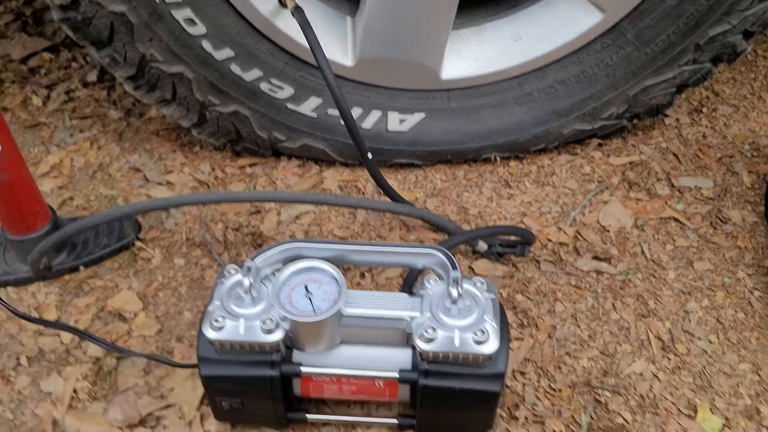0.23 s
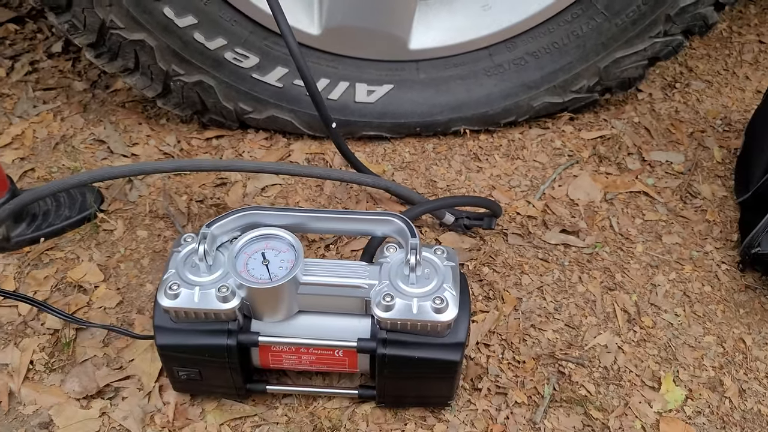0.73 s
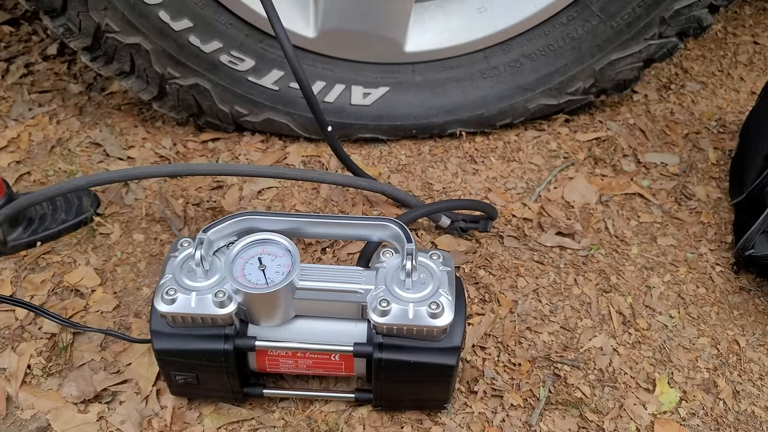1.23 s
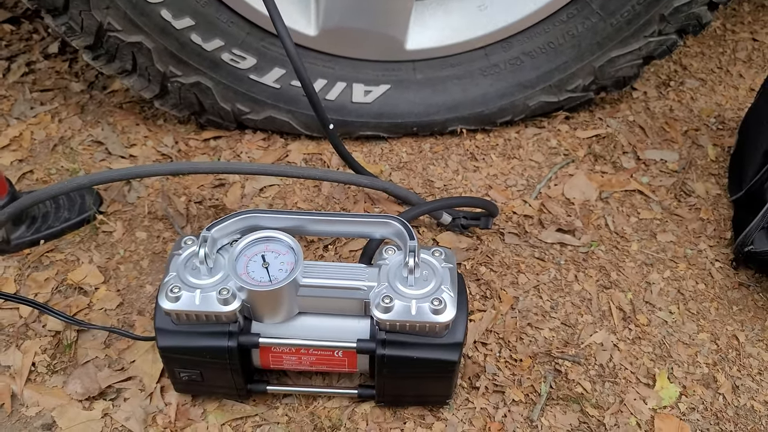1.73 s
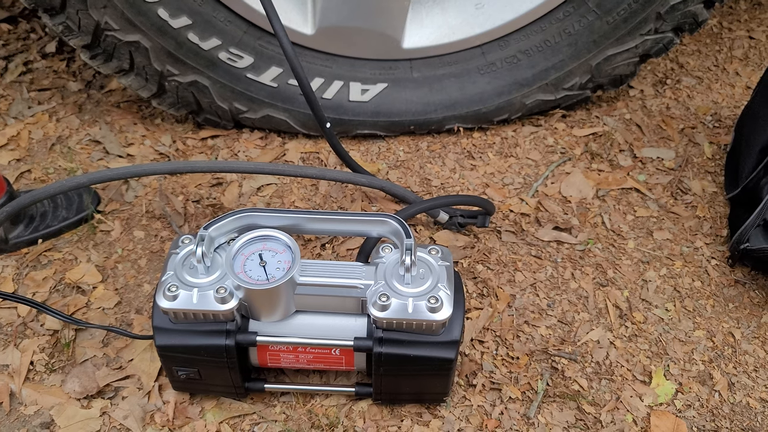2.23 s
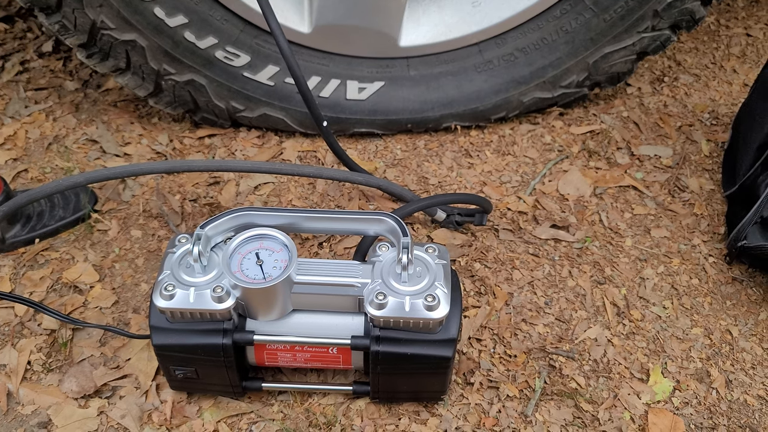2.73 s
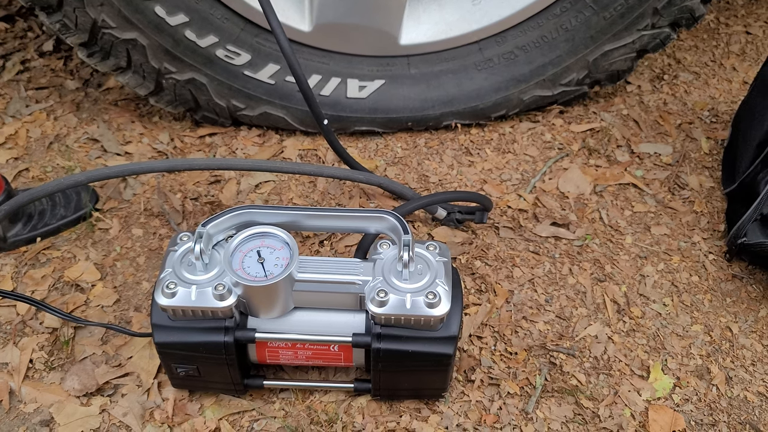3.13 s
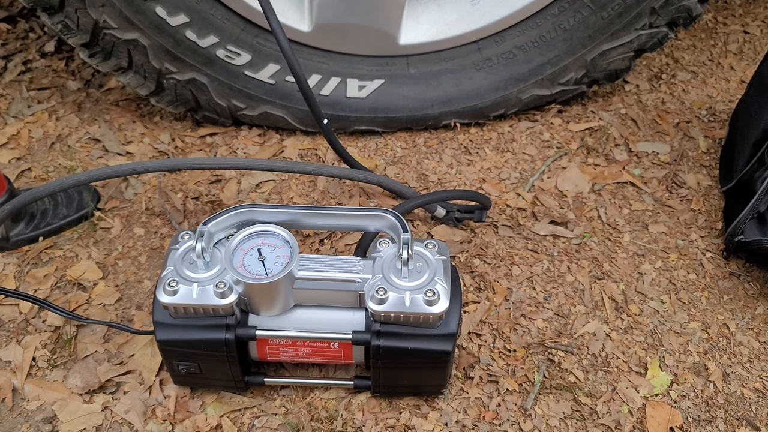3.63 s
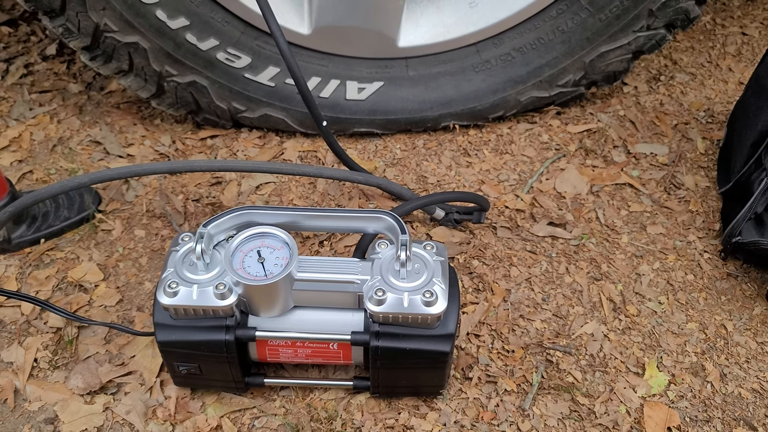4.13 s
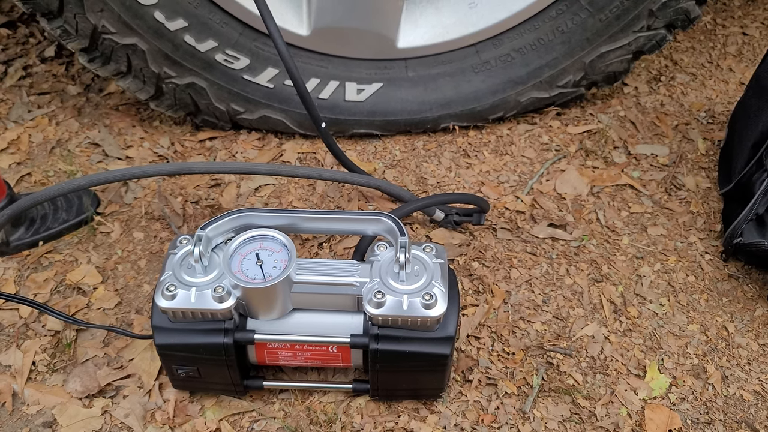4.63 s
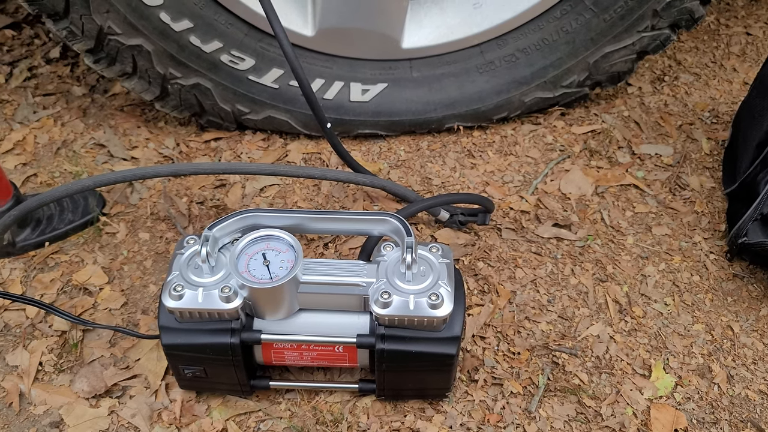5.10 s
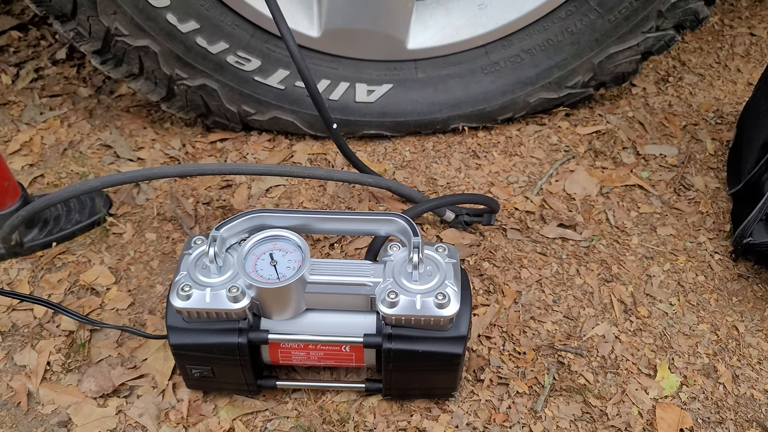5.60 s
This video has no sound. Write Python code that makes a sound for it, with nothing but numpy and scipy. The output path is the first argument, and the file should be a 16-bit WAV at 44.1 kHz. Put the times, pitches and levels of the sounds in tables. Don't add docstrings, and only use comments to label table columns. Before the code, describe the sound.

Close stereo sound of a small tire pump working outdoors: a steady mid-low drone, fast ticking metal valves fused into a rattle, bright breathy hiss and a faint thin motor whine. The speed barely changes, though the upper buzz softens slightly later on. A bird chirps briefly near the start and again at the very end, over faint wind rumble.

```python
import sys
import numpy as np
from scipy import signal
from scipy.fft import rfft, irfft
from scipy.io import wavfile

SR = 44100
rng = np.random.default_rng(int(sys.argv[2]) if len(sys.argv) > 2 else 0)


def gain_from_decibels(decibels):
    exponent = np.asarray(decibels, float) / 20
    return 10 ** exponent


def output_pcm(signal):
    pcm = np.clip(np.atleast_2d(signal).T, -1, 1) * 32767
    wavfile.write(sys.argv[1], SR, np.round(pcm).astype(np.int16))


N = 258426

# time_s, speed_turns_per_s
CRANK_SPEED = [(0, 34.731), (1.3, 34.752), (1.8, 34.817), (2.3, 34.825), (2.55, 34.796), (2.85, 34.813),
               (3.05, 34.843), (3.4, 34.849), (3.65, 34.811), (3.9, 34.821), (4.2, 34.865), (4.6, 34.823),
               (4.96, 34.818), (5.2, 34.833), (5.86, 34.82)]
START_TURN = 0.95
# time_s, level_db
HAND_NEARNESS = [(0, 2), (.4, 2.5), (.8, 1.5), (1.5, 2), (2.5, 1.5), (3.5, 1.5), (4.5, 1.5), (5.2, 2),
                 (5.86, 2)]

# pitch_hz, level_db (per Hz)
BREEZE_COLOUR = [(15, -35), (28, -14), (42, -3), (55, 8), (80, -2), (120, -2.5), (250, -31), (500, -24)]
BREEZE_DB = -46.5
# start_s, length_s, start_pitch_hz, end_pitch_hz, level_db
BIRD_CHIRPS = [
    (.178, .038, 4050, 4500, -36.5),
    (.563, .038, 4020, 4500, -36),
    (5.51, .035, 4150, 4450, -41.5),
    (5.768, .008, 5500, 3900, -32.5),
]

MOTOR_ORDERS = [50, 75, 81, 94]
# level_db, swell_over_run_db, left_minus_right_db
MOTOR_WHINE = [(-51.5, -4.5, -10), (-49.5, -7, -4), (-59, 8, 4), (-57, 9.5, -7)]

# order (cycles per crank turn), level_db
HUM_ORDERS = [(1, -25), (2, -9), (3, -22), (4, -9), (5, -19), (6, -17), (7, -12), (8, -15), (9, -12),
              (10, -7), (11, -18), (12, -20), (13, -23), (14, -27), (15, -26), (16, -24),
              (17, -21), (18, -9), (19, -7), (20, -9), (21, -9), (22, -13), (23, -6), (24, 0), (25, -1),
               (26, -1), (27, -11), (28, -9), (29, -7), (30, -11), (31, -20), (32, -12), (33, -11),
               (34, -22), (35, -17), (36, -14), (37, -15), (38, -22), (39, -14), (40, -20), (41, -21),
               (42, -28)]
# pitch_hz, crank_angle_turns
HOUSING_BLOWS = [(170, -.067), (453, .081), (484, .467), (625, .052), (787, 1.135), (807, .469),
                 (924, .172), (980, .9), (1182, -.134), (1533, -.096)]
THUMP_START = -0.243
# pitch_hz, left_minus_right_db
HUM_BALANCE = [(60, 0), (150, 1), (300, 0.5), (500, -2), (700, 3), (900, -2.5), (1100, -2), (1500, -7)]
# time_s, level_db
UPPER_HUM_LEVEL = [(0, 4.5), (.5, 2.5), (1.5, 1), (3, 1.5), (4.5, -3), (5.86, -3)]
UPPER_HUM_FROM_HZ = 1300
HUM_DB, HUM_LAG_MS, HUM_WAVER_DB, ONCE_A_TURN_DB = -32, -0.12, 0.3, -14
HUM_NEAR_SHARE, HUM_LIFT_DB = 0.34, -0.62

# pitch_hz, level_db (per Hz)
LEFT_HISS = [(300, 4.5), (480, -1), (640, 17), (1000, 13.5), (1500, 6.5), (2000, 7.5), (3300, 5),
             (4500, 0.5), (5800, -3), (8200, 0.5), (9300, -11.5), (12000, -10.5), (14500, -6.5),
             (15800, -14.5)]
# pitch_hz, level_db (per Hz)
RIGHT_HISS = [(300, 6), (480, -0.5), (640, -6), (1000, 7.5), (1500, 0), (2000, 7), (3300, 2.5), (4500, 1.5),
              (5900, 8), (7200, 3), (8800, -23), (10400, -6.5), (12000, -14.5), (15800, -27.5)]
# pitch_hz, likeness (-1 to 1)
EAR_LIKENESS = [(100, 0.5), (700, 0.12), (2000, 0.49), (5000, 0.24), (9000, 0.23), (15000, 0.13)]
# pitch_hz, width_hz, level_db (over the hiss)
COOLING_FINS = [(12950, 150, 6), (13400, 200, 4), (13950, 160, 4), (14250, 140, 4), (14600, 150, 7),
                (15000, 140, 5), (15550, 200, 4)]
# crank_angle_turns, width_turns, level_db (over steady hiss), fin_level_db
AIR_STROKES = [
    (.31, .11, 5.5, 2),
    (.80, .095, 7, 9),
]
HISS_DB = -34.5
REPEAT_SHARE, REPEAT_FROM_HZ = 0.5, 1450

# (pitch_hz, rise_ms, level_db, left_minus_right_db)
VALVE_SLAPS = [
    (.05, -.15, [(1800, 1.5, -42, -3), (3250, 1.2, -42, 2)]),
    (.20, -0.21, [(5650, 1.5, -31, -5.5), (6460, 4.5, -41.5, -4), (7700, 1.2, -45, 18), (3294, 2.4, -39.5, 2), (1740, 2.3, -39.5, -2)]),
    (.34, -0.16, [(4850, 0.27, -40.5, 4), (5370, 0.92, -39, 0), (2250, 0.72, -38, -10)]),
    (0.641, -0.11, [(1741, 1.2, -33, -1), (2617, 2.75, -41.5, 5), (6120, 1.8, -37, -9), (5350, 2.9, -39.5, -10)]),
    (0.741, -0.13, [(3270, 2.4, -42, 8), (3970, 0.62, -37.5, 4), (6940, 0.64, -42.5, -7), (7940, 3.2, -51, 20), (2600, 0.75, -40, 2)]),
    (0.791, -0.13, [(1997, 0.95, -30, -7.5), (2820, 3.1, -39.5, -2), (6130, 1.2, -28.5, -8), (5180, 1.1, -38, -6), (7970, 0.53, -45, 18), (4700, 2.1, -45, 7), (14600, 1.5, -44, 8), (12950, 1.5, -45, 8)]),
]
SLAP_DB, SLAP_DRIFT_DB = 0.6, 0.5
SLAP_JITTER_MS, SLAP_WANDER_MS = 0.008, 0.022
SLAP_EARLY = 0.018


def evened(x):
    return x / np.sqrt(np.mean(x ** 2))


def read(points, hz):
    pitch, value = np.transpose(points)
    return np.interp(np.log(hz + 1), np.log(pitch + 1), value)


def curve(points):
    return np.interp(np.arange(N) / SR, *np.transpose(points))


def drift(top_hz):
    steps = rng.standard_normal(int(N / SR * top_hz * 2) + 2)
    places = np.linspace(0, len(steps) - 1, N)
    return evened(np.interp(places, np.arange(len(steps)), steps))


def noise(left_colour, right_colour, lag_ms):
    hz = np.fft.rfftfreq(N, 1 / SR)
    first, second = rfft(rng.standard_normal((2, N)))
    same = np.clip(read(EAR_LIKENESS, hz), -1, 1)
    left = first * np.exp(-2j * np.pi * hz * lag_ms / 1000)
    right = same * first + np.sqrt(1 - same ** 2) * second
    pair = np.array([left * gain_from_decibels(read(left_colour, hz)), right * gain_from_decibels(read(right_colour, hz))])
    fins_db = sum(db / (1 + (2 * (hz - fin_hz) / width_hz) ** 2) for fin_hz, width_hz, db in COOLING_FINS)
    return evened(irfft(pair * gain_from_decibels(fins_db), N))


def breeze():
    return noise(BREEZE_COLOUR, BREEZE_COLOUR, -0.32) * gain_from_decibels(BREEZE_DB + 2 * drift(2.7))


def bird():
    out = np.zeros(N)
    for start_s, length_s, from_hz, to_hz, db in BIRD_CHIRPS:
        hz = np.linspace(from_hz, to_hz, round(length_s * SR))
        whistle = np.sin(2 * np.pi * np.cumsum(hz) / SR)
        out[round(start_s * SR):][:len(hz)] += gain_from_decibels(db) * np.hanning(len(hz)) * whistle
    return np.array([out, 0.7 * np.roll(out, 1)])


def whine(turns):
    out, run = np.zeros((2, N)), np.linspace(0, 1, N)
    for order, (db, swell_db, lean_db) in zip(MOTOR_ORDERS, MOTOR_WHINE):
        level = gain_from_decibels(db + swell_db * run + 0.8 * drift(3))
        balance = gain_from_decibels(np.array([[lean_db], [-lean_db]]) / 2)
        out += balance * level * np.cos(2 * np.pi * (order * turns + rng.random()))
    return out


def hum(turns):
    out, lag_s = np.zeros((2, N)), HUM_LAG_MS / 1000
    lag_turns = curve(CRANK_SPEED) * lag_s
    orders = HUM_ORDERS
    pitches = np.array(orders)[:, 0] * CRANK_SPEED[0][1]
    delays = np.cumsum(np.interp(pitches, *np.transpose(HOUSING_BLOWS)))
    for (order, db), hz, delay in zip(orders, pitches, delays):
        odd_shift = order % 2 / 4
        phase = 2 * np.pi * (order * turns - delay + THUMP_START + odd_shift)
        db = HUM_DB + db + HUM_WAVER_DB * drift(9)
        db = db + (hz > UPPER_HUM_FROM_HZ) * curve(UPPER_HUM_LEVEL)
        db = db + (order == 1) * ONCE_A_TURN_DB
        level, lean_db = gain_from_decibels(db) * np.sqrt(2), read(HUM_BALANCE, hz) / 2
        ear_shift = np.pi * order * lag_turns
        out[0] += level * gain_from_decibels(lean_db) * np.cos(phase - ear_shift)
        out[1] += level * gain_from_decibels(-lean_db) * np.cos(phase + ear_shift)
    return out


def clatter(turns, air):
    size = round(SR / CRANK_SPEED[0][1])
    pieces = signal.resample(air[:, :2 * size].reshape(2, 2, size), 4 * size, axis=2)
    angle = np.arange(4 * size) / (4 * size)
    played = np.array([[np.interp(turns, angle, piece, period=1) for piece in ear] for ear in pieces])
    blend = np.linspace(0, np.pi / 2, N)
    rattle = played[:, 0] * np.cos(blend) + played[:, 1] * np.sin(blend)
    return signal.sosfilt(signal.butter(6, REPEAT_FROM_HZ, "high", fs=SR, output="sos"), rattle)


def hiss(turns):
    air = noise(LEFT_HISS, RIGHT_HISS, -0.2)
    low = signal.sosfiltfilt(signal.butter(2, 1200, fs=SR, output="sos"), air)
    fresh = air - low
    high = np.sqrt(1 - REPEAT_SHARE) * fresh + np.sqrt(REPEAT_SHARE) * clatter(turns, fresh)
    top = signal.sosfiltfilt(signal.butter(4, 11800, "high", fs=SR, output="sos"), high)
    push = np.array([np.exp(-(((turns - at + 0.5) % 1 - 0.5) / width) ** 2)
                     for at, width, *_ in AIR_STROKES])
    middle_swell, fin_swell = gain_from_decibels(np.array(AIR_STROKES)[:, 2:].T @ push + 0.5 * drift(30))
    middle = (high - top) * evened(middle_swell)
    fins = top * evened(fin_swell * gain_from_decibels(1.0 * drift(2)))
    return gain_from_decibels(HISS_DB) * (low + middle + fins)


def ring(at, size, hz, rise_ms):
    pole = (-1000 / rise_ms + 2j * np.pi * hz) / SR
    blows, whole = np.zeros(N + SR, complex), np.ceil(at).astype(int)
    blows[whole] = size * np.exp(pole * (whole - at))
    return signal.lfilter([-np.e * pole.real], np.poly([np.exp(pole)] * 2), blows[:N]).imag


def valves(turns):
    out, laps = np.zeros((2, N)), np.arange(np.floor(turns[-1]) + 1)
    for angle, lag_ms, rings in VALVE_SLAPS:
        due, wander_ms = laps + angle - SLAP_EARLY, SLAP_WANDER_MS * drift(2)
        at = np.interp(due[due > turns[0]], turns, np.arange(N), right=N + 99)
        nearest = np.minimum(at, N - 1).astype(int)
        for hz, rise_ms, db, lean_db in rings:
            force, late = rng.standard_normal((len(laps), 2))[:len(at)].T
            slow_db = SLAP_DRIFT_DB * drift(1)[nearest]
            late_ms = late * SLAP_JITTER_MS + wander_ms[nearest]
            hit = np.abs(at + late_ms * SR / 1000)
            size = gain_from_decibels(db + SLAP_DB * force + slow_db)
            left_hit = np.abs(hit + lag_ms * SR / 1000)
            out[0] += gain_from_decibels(lean_db / 2) * ring(left_hit, size, hz, rise_ms)
            out[1] += gain_from_decibels(-lean_db / 2) * ring(hit, size, hz, rise_ms)
    return out


def scene():
    turns = START_TURN + np.cumsum(curve(CRANK_SPEED)) / SR
    near_db = curve(HAND_NEARNESS)
    background = breeze() + bird()
    housing = gain_from_decibels(HUM_NEAR_SHARE * near_db + HUM_LIFT_DB) * hum(turns)
    treble = gain_from_decibels(near_db) * (hiss(turns) + valves(turns))
    return background + whine(turns) + housing + treble


def band_limit(x):
    return signal.sosfilt(signal.butter(12, 16390, fs=SR, output="sos"), x)


def record(dry):
    notch_hz, notch_width_hz, top_hz = 8750, 900, 15740
    right = signal.lfilter(*signal.iirnotch(notch_hz, notch_hz / notch_width_hz, SR), dry[1])
    top_cut = signal.firwin(511, top_hz, window=("kaiser", 9), fs=SR)
    mix = signal.oaconvolve([dry[0], right], top_cut[None], "same")
    return band_limit(mix)


dry = scene()
out = record(dry)
output_pcm(out)
```